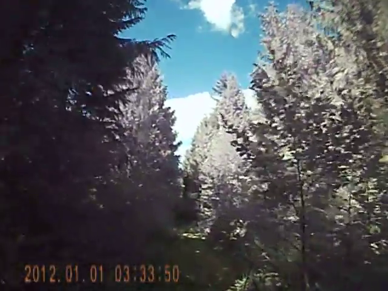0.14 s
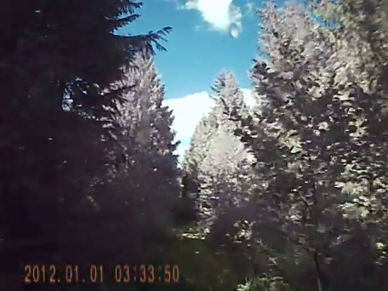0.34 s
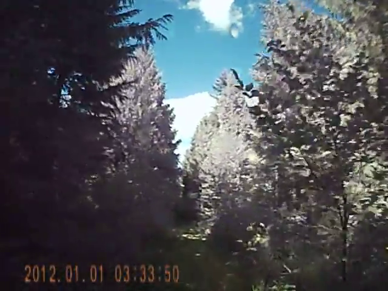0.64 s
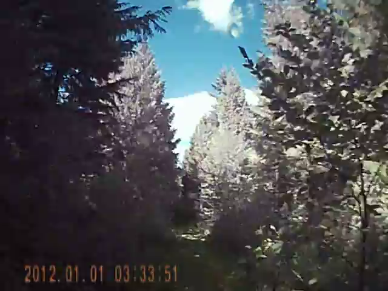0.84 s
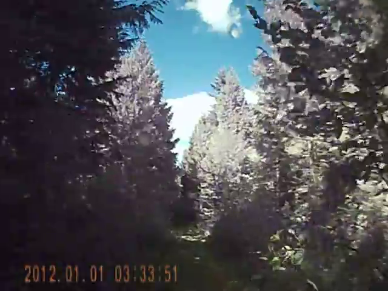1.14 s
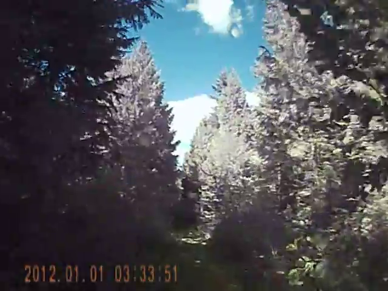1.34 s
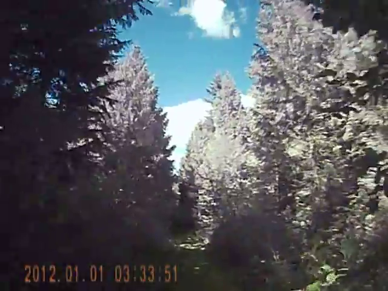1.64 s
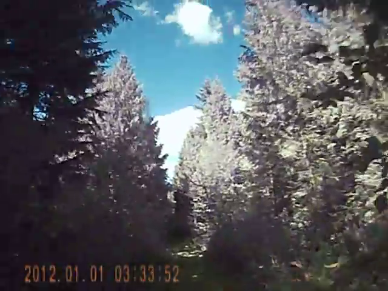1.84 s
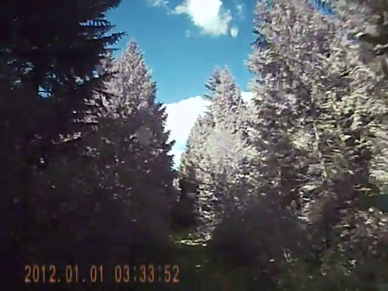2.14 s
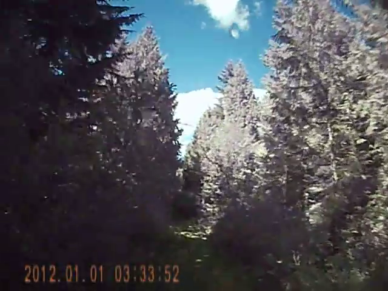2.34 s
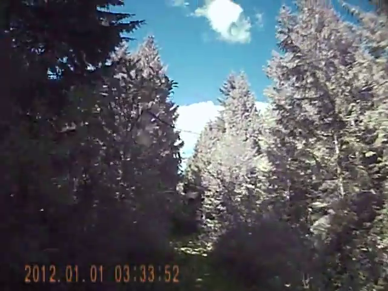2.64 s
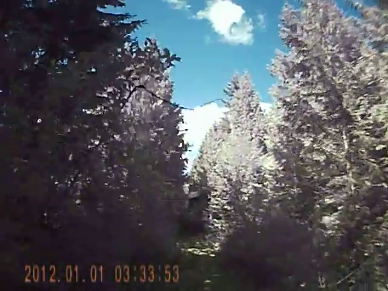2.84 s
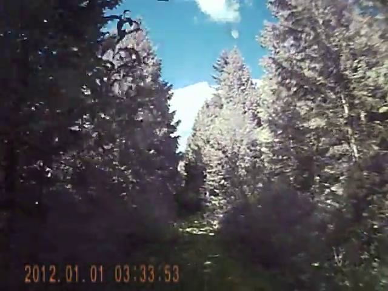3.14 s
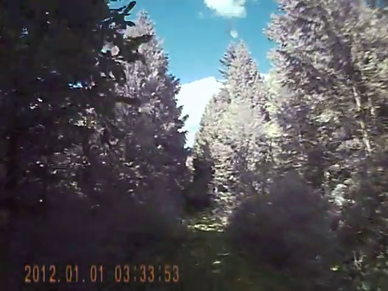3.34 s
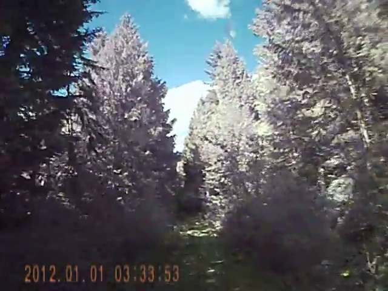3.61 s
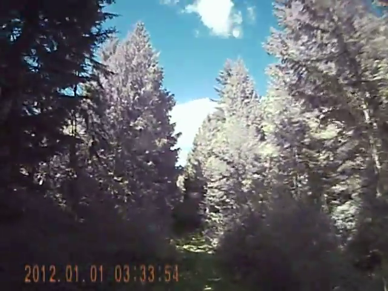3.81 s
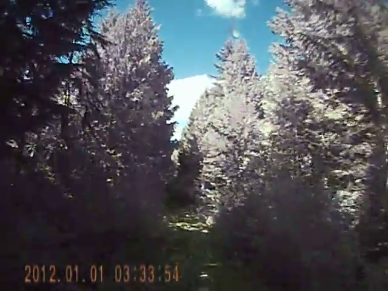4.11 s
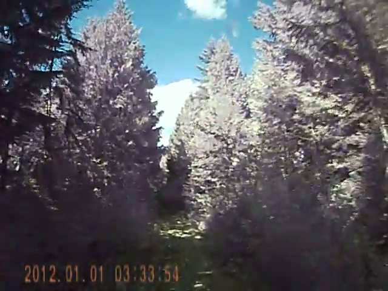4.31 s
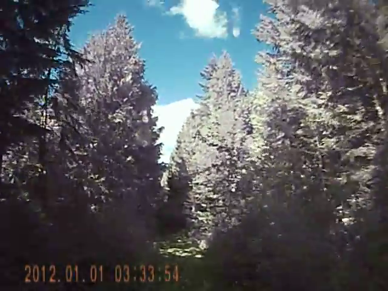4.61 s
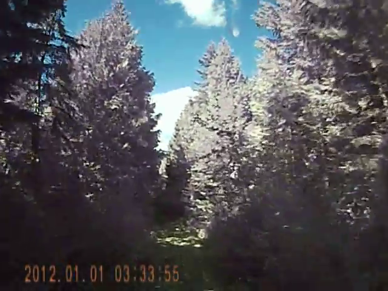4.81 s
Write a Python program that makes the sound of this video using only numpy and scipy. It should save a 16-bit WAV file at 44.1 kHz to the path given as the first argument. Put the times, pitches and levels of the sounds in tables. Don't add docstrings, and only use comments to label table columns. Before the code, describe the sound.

A low-gear engine hums and climbs in pitch under bumpy cabin rumble. Around one second something loose taps rapidly on glass; after two seconds branches scrape and crack along the side, growing dense and loud, with heavy suspension thumps around four seconds. Heard close inside the vehicle through a crude, distorting, muffled microphone.

```python
import sys
import numpy as np
from scipy import signal
from scipy.fft import rfft, irfft, next_fast_len
from scipy.io import wavfile
from scipy.ndimage import map_coordinates

SR = 44100
rng = np.random.default_rng(int(sys.argv[2]) if len(sys.argv) > 2 else 0)


def unload_wav(signal):
    wavfile.write(
        sys.argv[1],
        SR,
        np.round(np.clip(np.atleast_2d(signal).T, -1, 1) * 32767).astype(np.int16),
    )


def boost_factor(decibels):
    exponent = np.asarray(decibels, float) / 20
    return 10 ** exponent


N = 219132
T = np.arange(N) / SR


def unit(x):
    return x / np.sqrt(np.mean(x ** 2) + 1e-20)


def curves(rows):
    s, *cols = np.transpose(rows)
    return [np.interp(T, s, c) for c in cols]


def wobble(rate):
    return map_coordinates(rng.standard_normal(1000), [T * rate])


def filtered(x, response):
    m = next_fast_len(N + SR // 2)
    return irfft(rfft(x, m) * response(np.fft.rfftfreq(m, 1 / SR)), m)[..., :N]


def coloured(spectrum):
    f, db = np.transpose(spectrum)

    def gain(hz):
        return boost_factor(np.interp(np.log(hz + 1), np.log(f + 1), db))

    return unit(filtered(rng.standard_normal(N), gain))


def resonant(x, modes):
    def response(f):
        total = 0
        for k, (centre, width, db) in enumerate(modes):
            damping = 1j * f * width
            total = total + (-1) ** k * boost_factor(db) * damping / (centre ** 2 - f ** 2 + damping)
        return total

    return unit(filtered(x, response))


def gritty(grit_db, rate):
    return unit(boost_factor(grit_db * wobble(rate)) * rng.standard_normal(N))


# t/s, firing rate f/Hz, load level/dB
ENGINE = [(0.06, 30.66, -24), (0.25, 32.05, -20), (0.68, 33.1, -23.5), (0.98, 37.35, -21.5),
          (1.33, 42.37, -16), (1.67, 45.02, -19.5), (1.97, 52.03, -22), (2.16, 53.75, -21.5),
          (2.51, 57.82, -21), (2.94, 60.14, -28), (3.2, 58.53, -17.5), (3.42, 59.58, -21.5),
          (3.66, 61.14, -20), (3.8, 64.8, -19), (4.19, 63.6, -23.5), (4.3, 60.2, -34.5), (4.51, 60.62, -25),
          (4.7, 68.4, -23)]
ORDER_DB = [1.5, -8, -15, -13]
# f/Hz, level/dB
CABIN = [(30, 1), (65, -1.5), (85, 2.5), (100, 2.5), (115, 2.5), (130, 3.5), (180, 4), (240, -4)]


def engine():
    hz, load_db = curves(ENGINE)
    cabin_hz, cabin_db = np.transpose(CABIN)
    upper_follow = 0.2
    eased_db = load_db.mean() + upper_follow * (load_db - load_db.mean())
    phase = 2 * np.pi * np.cumsum(hz) / SR
    orders = 0
    for k, order_db in enumerate(ORDER_DB):
        pull_db = eased_db if k else load_db
        air_db = np.interp(np.log((k + 1) * hz), np.log(cabin_hz), cabin_db)
        gain = np.sqrt(2) * boost_factor(pull_db + order_db + air_db + 2.85 * wobble(12))
        orders = orders + gain * np.sin((k + 1) * phase + 0.5 * wobble(9))
    return orders, phase


# t/s, shake level/dB
TRACK = [(0, -26), (.35, -27.5), (1, -25), (1.4, -23), (2.2, -23), (2.4, -20.5), (2.85, -21.5), (3, -19.5),
         (3.43, -22.5), (3.64, -16), (4.0, -23), (4.4, -10), (4.65, -14.5), (4.86, -18), (4.97, -22)]
# t/s, half length/s, heave level/dB, drone level/dB
LURCHES = [(0.408, 0.019, -30.5, -20.5), (1.092, 0.038, -14.5, -21.5), (1.904, 0.18, -20.5, -26.5),
           (2.191, 0.12, -17, -38), (2.479, 0.082, -17, -33.5), (2.727, .12, -18, -29),
           (2.98, 0.037, -16, -41), (3.32, 0.076, -20, -30), (3.697, 0.054, -19, -25),
           (3.83, 0.031, -19.5, -6), (3.916, 0.059, -14, -11), (4.046, 0.016, -18, -8.5),
           (4.19, 0.047, -15, -20), (4.238, 0.012, -24, -12), (4.36, 0.05, -11, -6.5),
           (4.472, 0.073, -14, -18), (4.623, .06, -22, -10.5), (4.865, .07, -17.5, -30)]


def shaking():
    shake_db, = curves(TRACK)
    heave_grows = 0.8
    heave_gain = boost_factor(shake_db.mean() - 2 + heave_grows * (shake_db - shake_db.mean()))
    drone_gain = boost_factor(shake_db)
    for s, half, heave_db, drone_db in LURCHES:
        lurch = np.exp(-((T - s) / half) ** 2)
        heave_gain = np.hypot(heave_gain, boost_factor(heave_db + 1.5) * lurch)
        drone_gain = np.hypot(drone_gain, boost_factor(drone_db - 1.1) * lurch)
    return heave_gain, drone_gain


# f/Hz, level/dB per Hz
HEAVE = [(5, -37), (14, 1.5), (30, -4), (50, -6), (70, -14), (120, -14.5), (200, -45)]
# f/Hz, level/dB per Hz
DRONE = [(40, -38), (90, -3), (140, 1.5), (260, 0.5), (400, 0), (600, -8), (1200, -20), (3000, -48)]


def rumble(phase):
    heave_gain, drone_gain = shaking()
    throb = boost_factor(1.57 * wobble(18) + 2.5 * np.sin(phase + 1.31))
    return heave_gain * coloured(HEAVE) + drone_gain * throb * coloured(DRONE)


# t/s, length/ms, push level/dB
JOLTS = [(0.139, 4.6, -10.5), (0.523, 4.8, -11.5), (1.266, 3.2, -2), (1.637, 5.4, -11), (1.728, 2.9, 0),
         (2.087, 9.5, -17), (2.237, 4.1, 5), (3.201, 6, -0.5), (3.735, 11, -5.5), (3.884, 4.6, 5),
         (3.899, 3.1, -1), (3.94, 6.3, 3), (4.148, 10, -6.5), (4.364, 5.3, -12), (4.418, 3.3, -9),
         (4.602, 1.8, 13)]


def jolts():
    return sum(-boost_factor(db + 7.5) * np.exp(-((T - s) / (0.00045 * ms)) ** 2) for s, ms, db in JOLTS)


# t/s, f/Hz, level/dB, swell/s
BOOMS = [(0.949, 590, -16.5, 0.024), (1.112, 340.4, -14, 0.017), (1.9, 680, -26.5, 0.23),
         (0.949, 1212, -19, 0.014), (2.35, 980, -25, 0.09), (2.412, 608, -15, 0.009),
         (2.536, 620, -16, 0.013), (3.548, 769, -22.5, 0.011), (3.549, 257.1, -10.5, 0.018),
         (2.36, 600, -16, 0.075), (2.86, 240, -28, 0.046), (3.059, 737, -19.5, 0.059),
         (3.629, 228, -12.5, 0.034), (3.701, 30.06, -12, 0.045), (3.87, 42.02, -8, 0.14),
         (3.919, 243.2, -16, 0.15), (4.08, 750, -9.5, 0.039), (4.23, 345.5, -8, 0.043),
         (4.209, 395, -11.5, 0.03), (4.629, 49.9, -12, 0.19)]


def booms():
    total = 0
    for s, hz, db, swell in BOOMS:
        tone = np.sin(2 * np.pi * hz * T + 1.3 * wobble(40))
        total = total + boost_factor(db) * np.exp(-((T - s) / swell) ** 2) * tone
    return total


# f/Hz, width/Hz, level/dB
PANEL = [(590, 294, 0.5), (769, 273, 2.5), (996, 132, 0.5), (1285, 273, -6)]


def through_panels(x):
    return resonant(x, PANEL)


# f/Hz, width/Hz, level/dB
GLASS = [(2053, 437, 1), (2723, 800, -1.64), (3840, 610, 1.95)]


def through_glass(x):
    return resonant(x, GLASS)


# t/s, pressure level/dB
DRAG = [(0, -35.5), (.9, -37), (1.09, -32), (1.24, -36.5), (1.41, -31.5), (1.87, -30.5), (2.2, -27.5),
        (2.35, -25.5), (2.7, -28.5), (2.89, -24.5), (3.11, -26), (3.3, -21), (3.55, -26), (3.8, -20),
        (4.1, -23), (4.45, -14.5), (4.7, -26.5), (4.97, -28)]


def pressure():
    return curves(DRAG)[0]


# t/s, length/s, glass level/dB, panel level/dB
SWIPES = [(0.906, 0.041, -35, -22), (1.162, 0.0086, -25.5, -30), (1.191, 0.0034, -31, -28),
          (1.211, 0.0026, -31.5, -23.5), (1.607, 0.016, -22, -23), (3.128, 0.013, -23, -17.5),
          (3.295, .012, -25, -20.5), (2.37, 0.0099, -18.5, -11), (2.323, 0.034, -17.5, -11),
          (2.4, 0.013, -24.5, -13.5), (3.022, 0.052, -26.5, -14.5), (3.095, 0.02, -17, -10.5),
          (3.389, 0.025, -29.5, -15.5), (3.514, 0.043, -16.5, -11.5), (3.57, 0.022, -28.5, -16.5),
          (3.828, 0.014, -23.5, -12), (3.92, 0.034, -18.5, -16), (4.027, 0.038, -17, -16),
          (4.076, 0.034, -16, -7.5), (4.204, 0.023, -36.5, -15), (4.34, 0.02, -29, -14.5),
          (4.372, 0.015, -13, -7), (4.434, 0.02, -16, -11.5), (4.548, 0.017, -22.5, -12.5),
          (4.635, 0.033, -26, -21.5), (4.76, 0.024, -29.5, -20.5), (4.853, 0.055, -33.5, -23),
          (4.923, 0.022, -40.5, -19), (4.687, 0.031, -33, -23.5)]


def with_swipes(glass_gain, panel_gain):
    for s, length, glass_db, panel_db in SWIPES:
        swipe_in = np.clip((T - s) / 0.0036, 0, 1)
        let_go = np.clip((s + length - T) / 0.03 + 1, 0, 1)
        glass_gain = np.hypot(glass_gain, boost_factor(glass_db) * swipe_in * let_go)
        panel_gain = np.hypot(panel_gain, boost_factor(panel_db) * swipe_in * let_go)
    return glass_gain, panel_gain


def foliage():
    panel_db = pressure()
    glass_db = panel_db - 11 + (1.09 - 1) * (panel_db - panel_db.mean())
    glass_gain, panel_gain = with_swipes(boost_factor(glass_db + 1.5), boost_factor(panel_db + 1.0))
    catches = gritty(grit_db=3.5, rate=100)
    panel_catches = 0.78 * catches + 0.62 * gritty(grit_db=1.5, rate=82)
    return glass_gain * through_glass(catches) + panel_gain * through_panels(panel_catches)



# t/s, peak level/dB
RATTLE = [(0.0644, -10), (.091, -27), (.116, -15.5), (0.9138, -9), (0.9404, -11), (0.9828, -12),
          (1.011, -15.5), (1.0718, -8.5), (1.0989, 0.5), (1.1266, -2), (1.1544, -9.5), (1.1826, -3),
          (1.2076, 0), (1.234, -6.5), (1.2555, -11.5), (1.3174, -16), (1.3384, -12), (1.3509, -15),
          (1.375, -11), (1.4217, -6), (1.4464, -15), (1.49, -29), (1.5152, -18), (1.54, -28),
          (1.564, -10.5), (1.607, -7), (1.652, -12.5), (1.685, -24), (1.8125, -22.5), (1.881, -20)]


def rattle():
    pitch_hz = 2140 * np.exp(0.14 * rng.standard_normal(len(RATTLE)))
    return [(s, db, -2.5, hz, 0.016) for (s, db), hz in zip(RATTLE, pitch_hz)]


def thin_twig(s, db, hz):
    knock_db = -1.5 - 19.5 * np.log2(hz / 2000)
    return s, db, knock_db, hz, 0.03


def stray_tips():
    when, size, pitch = rng.random((3, 40))
    at = when * (N - 1) / SR
    peak_db = np.interp(at, T, pressure()) - 2.5 * np.log(size + 0.05)
    return [thin_twig(*tip) for tip in zip(at, peak_db, 1500 + 900 * pitch)]


# t/s, peak level/dB, ring f/Hz
TWIGS = [(.257, -28.5, 1500), (.3585, -26.5, 1520), (.3921, -29, 1660), (1.7614, -34, 1700),
         (1.8477, -23, 2070), (2.0265, -19.5, 1509), (2.098, -26.5, 2660), (2.462, -18.5, 3878),
         (2.532, -16, 2870), (2.584, -14.5, 2490), (2.688, -30, 1480), (2.7432, -27.5, 1690),
         (2.8114, -14.5, 2410), (2.8559, -12.5, 1690), (2.9852, -10.5, 2270), (3.028, -20, 2190),
         (3.1884, -15.5, 2190), (3.2094, -16, 1860), (3.238, -13, 2020), (3.2864, -9.5, 2020),
         (3.6681, -21.5, 1600), (3.867, -20.5, 1640), (3.972, -14, 2380), (3.9844, -9, 3105),
         (4.204, -12.5, 1970), (4.286, -11.5, 3090), (4.337, -14.5, 1940), (4.524, -12, 1940),
         (4.5527, -14.5, 1560), (4.9482, -18, 2190)]


def flicks():
    return [thin_twig(*twig) for twig in TWIGS]


# t/s, peak level/dB, knock level/dB over peak, ring f/Hz
SNAPS = [(2.325, -6.5, -1.5, 3440), (2.3703, -2.5, -17, 1970), (2.9097, -11.5, -1.5, 2030),
         (3.0066, -7, -5.5, 1960), (3.0375, -7.5, 7.5, 2590), (3.046, -6, 1, 1900), (3.0807, -14, -5, 3030),
         (3.0954, 0.5, 3, 1924), (3.262, -8, -4.5, 2110), (3.312, -11.5, 3.5, 1620), (3.3864, -7, 0, 2190),
         (3.5223, 0, -8, 3840), (3.5409, 4, 8, 1574), (3.752, -23.5, 15, 1596), (3.8348, -2, 0.5, 1700),
         (3.8877, -5.5, -11, 3055), (3.9101, 5, 1.5, 3580), (3.9451, -6, -10.5, 1900),
         (4.0298, -17, 12, 1610), (4.0506, -14, 16, 1510), (4.086, 0.5, -3, 1510), (4.157, -7.5, 8, 1710),
         (4.1834, -15.5, 5, 1530), (4.2607, -8, 0.5, 1540), (4.352, -8.5, 3, 1554), (4.382, 7, -1.5, 2160),
         (4.437, 3, -15, 2060), (4.4761, -8.5, 10, 1820), (4.6248, -5, 1.5, 1800), (4.7678, -20.5, 9, 3800)]


def snaps():
    return [(s, db, knock_db, hz, 0.022) for s, db, knock_db, hz in SNAPS]


def contacts():
    ticks, knocks, rings = np.zeros((3, N + SR))
    t = np.arange(SR // 4) / SR
    rise = 1 - np.exp(-t / 0.0003)
    for s, db, knock_db, hz, t60 in rattle() + stray_tips() + flicks() + snaps():
        life = max(t60, 0.005)
        here = slice(round(s * SR), round(s * SR) + len(t))
        lean, warp = rng.standard_normal(2)
        tone = np.sin(2 * np.pi * hz * t * (1 + 12 * warp * t) + lean)
        ticks[here] += boost_factor(db - 5.5 - 60 * t / life) * rise
        knocks[here] += boost_factor(db + knock_db - 4.0 - 60 * t / (2.03 * life)) * rise
        rings[here] += boost_factor(db - 3.5 - 60 * t / (0.69 * life)) * rise * tone
    bright = through_glass(rng.standard_normal(N))
    dull = through_panels(rng.standard_normal(N))
    return ticks[:N] * bright + knocks[:N] * dull + rings[:N]


def scene():
    orders, phase = engine()
    body = rumble(phase) + jolts() + booms()
    return (orders + body + foliage() + contacts())[None]


def top_cut(x):
    return signal.sosfilt(signal.butter(12, 15950, fs=SR, output="sos"), x)


CAMERA_RATE = (80, 441)


def record(dry):
    up, down = CAMERA_RATE
    lower_rail, upper_rail, offset = -1 / np.sqrt(2), 0.3, -0.432
    coarse = signal.resample_poly(dry[0], up, down)
    coarse = np.clip(coarse + offset, lower_rail, upper_rail)
    taps = signal.firwin(32 * down + 1, 3980, window=("kaiser", 9), fs=up * SR)
    fine = signal.resample_poly(coarse, down, up, window=taps, padtype="edge")
    fine = np.pad(fine, (0, 8), "edge")[:N]
    mix = np.maximum(fine, lower_rail)[None]
    return top_cut(mix)


dry = scene()
out = record(dry)
unload_wav(out)
```